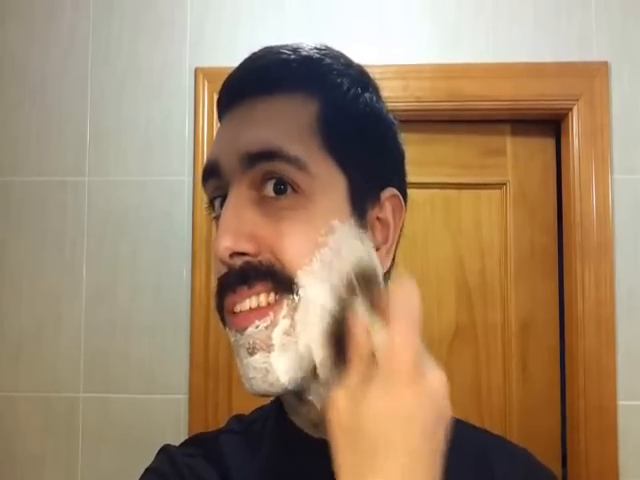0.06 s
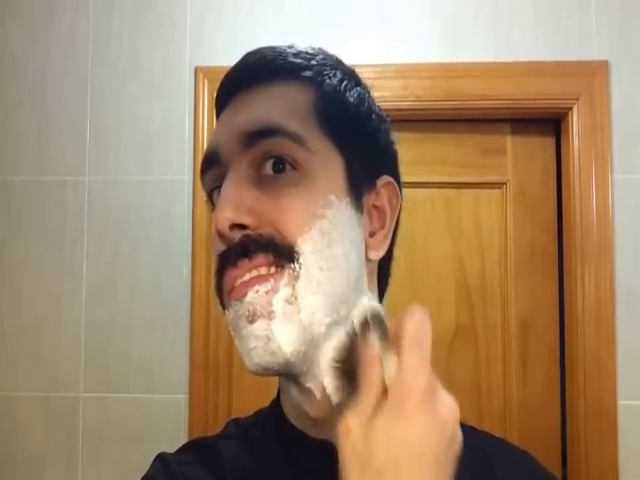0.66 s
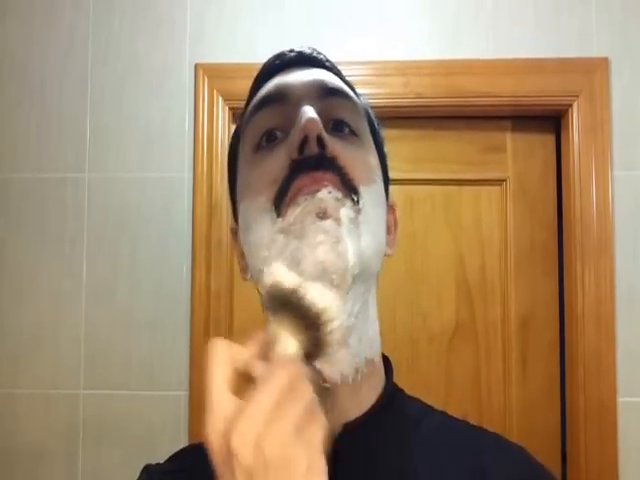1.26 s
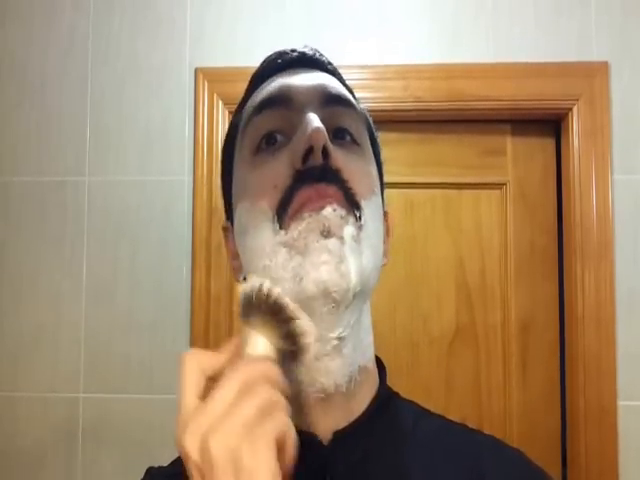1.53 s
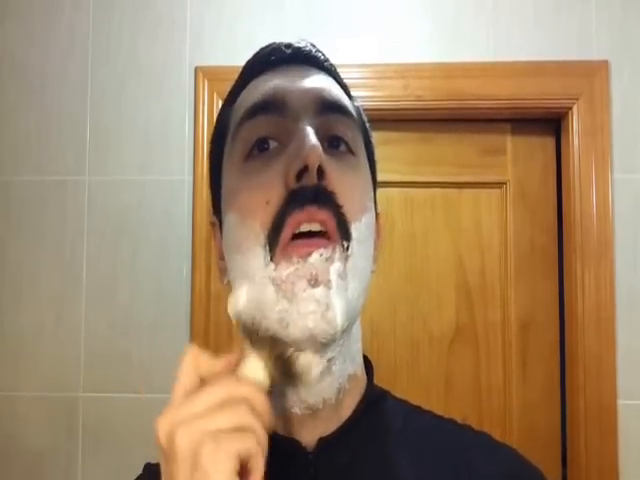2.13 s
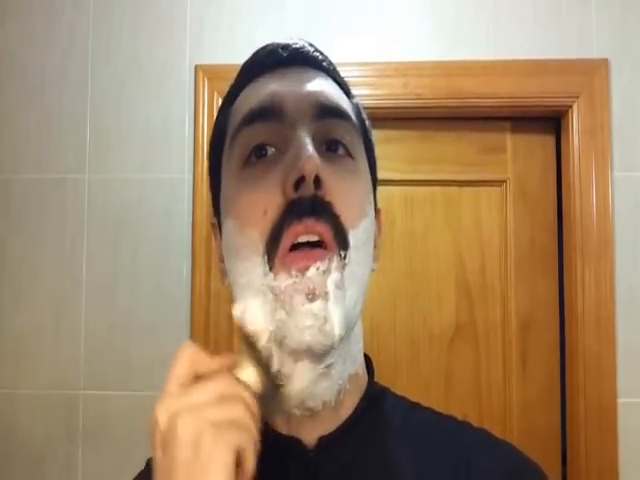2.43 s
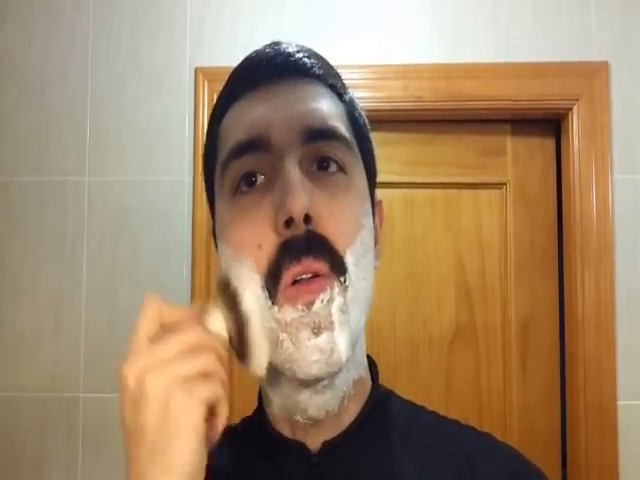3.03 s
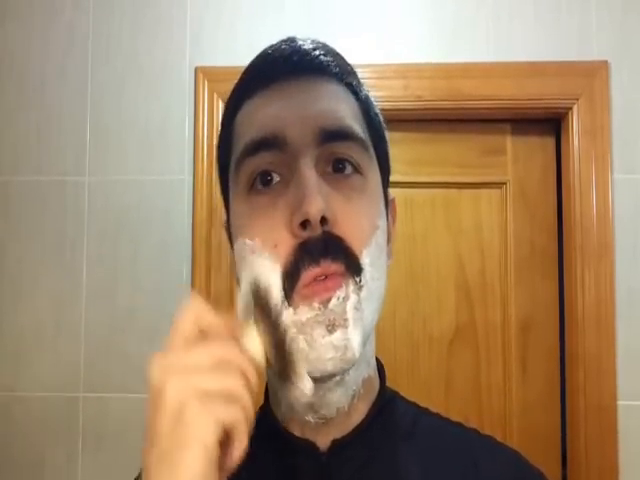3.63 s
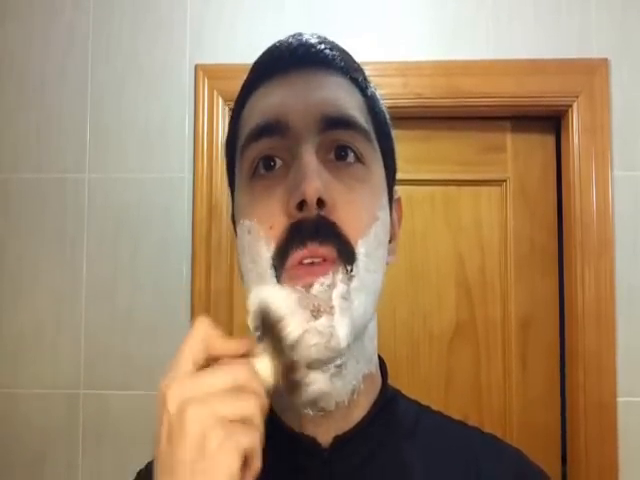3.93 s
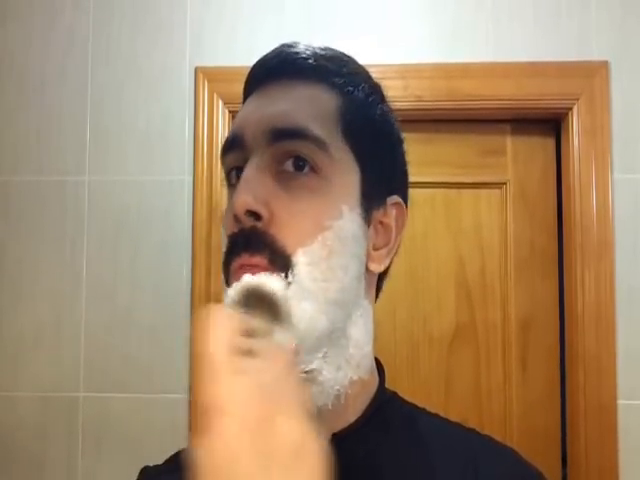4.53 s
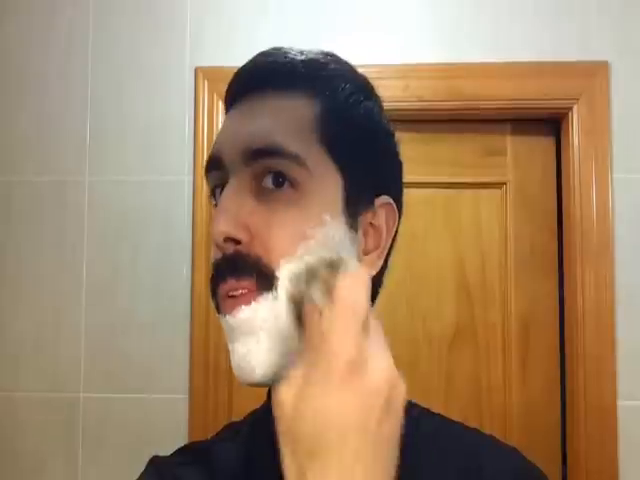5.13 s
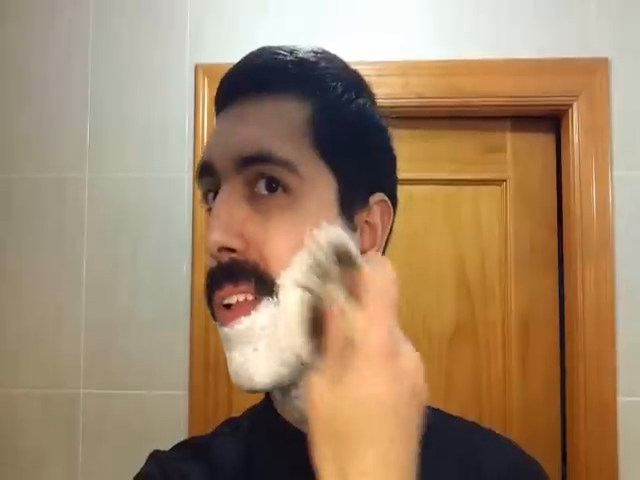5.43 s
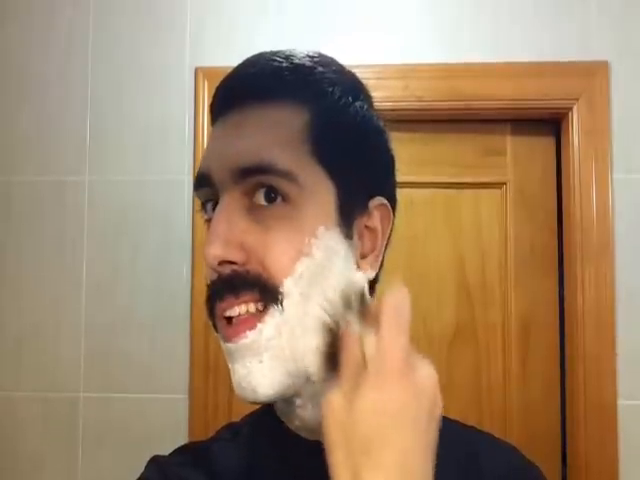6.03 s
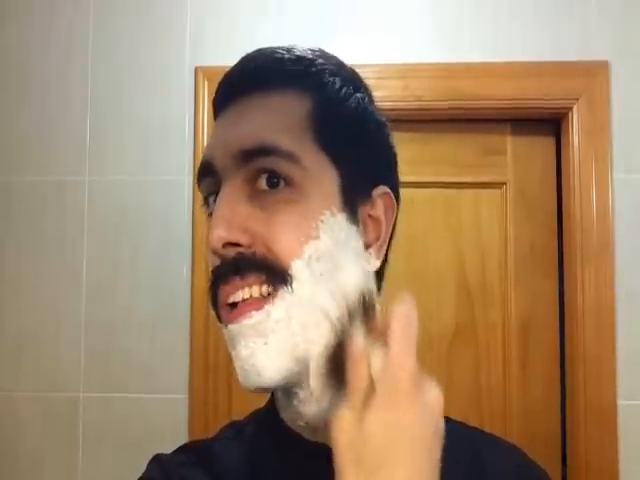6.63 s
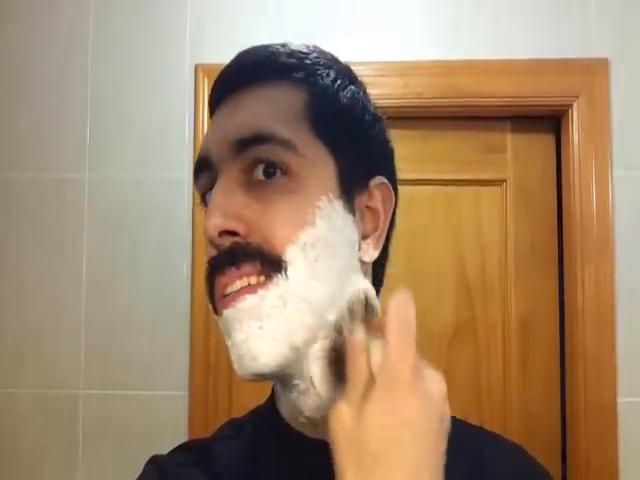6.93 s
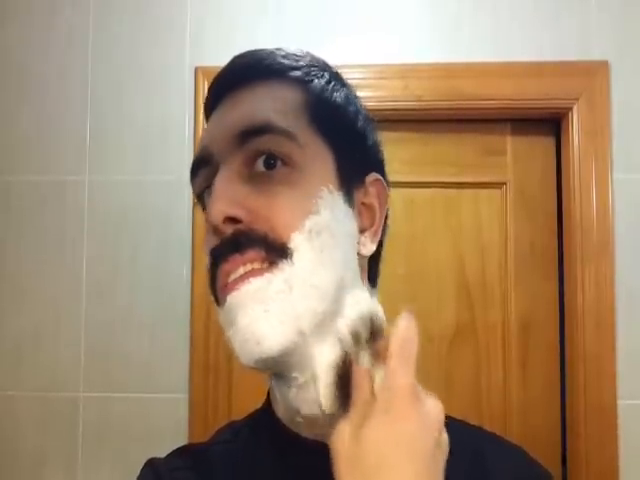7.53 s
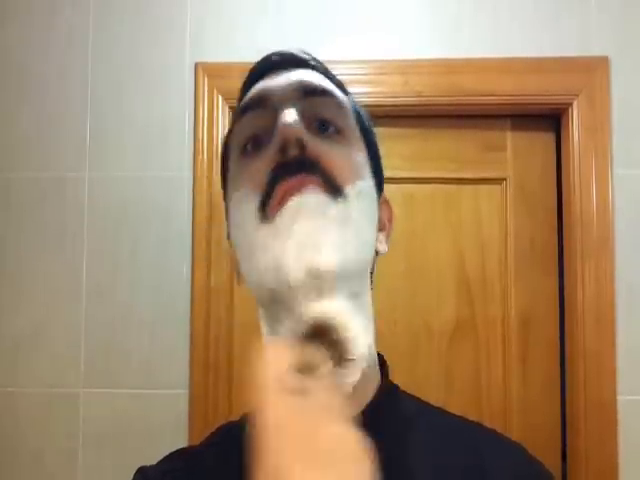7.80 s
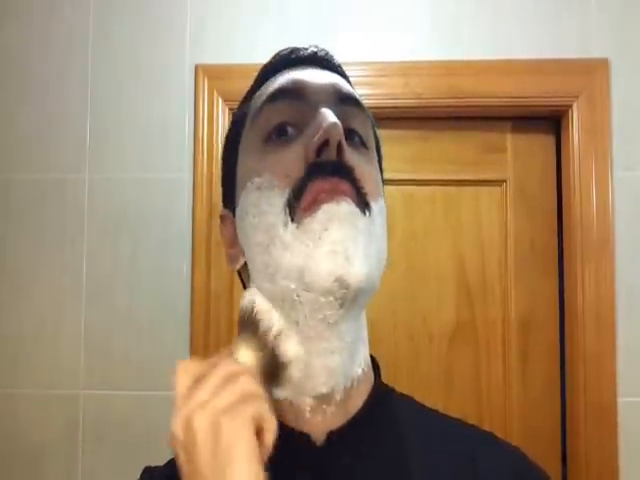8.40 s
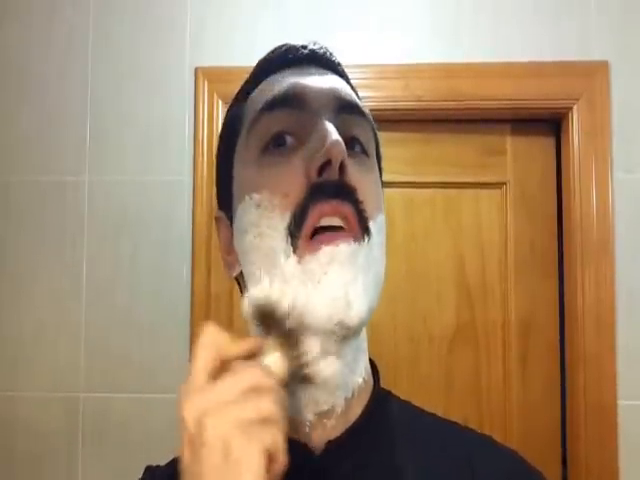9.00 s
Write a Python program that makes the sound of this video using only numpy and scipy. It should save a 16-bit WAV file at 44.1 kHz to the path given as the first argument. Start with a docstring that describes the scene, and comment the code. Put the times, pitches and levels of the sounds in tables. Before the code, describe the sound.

Soft, rapid swishing runs throughout as a wet brush rubs shaving foam back and forth on stubbly skin. The strokes sound a little hollow on the cheek, grow lighter around the middle, then firm up again, with small bristle ticks and a few popping bubbles. A nearby stereo microphone picks up the short reverberation of a tiled bathroom and a constant background hiss.

```python
"""Quick wet swishes, eight or nine a second, sound in a small tiled bathroom over a steady hiss.
A shaving brush is working lather over cheeks and neck: the bristles stick and slip on stubble, the foam
squelches, bursting bubbles fizz, and now and then a tuft flicks free. The tiled walls add resonances and
a short reverberation; a few faint low bumps lie beneath. A phone at arm's length hears it in stereo."""
import sys
import numpy as np
from scipy import signal
from scipy.fft import rfft, irfft
from scipy.io import wavfile
from scipy.ndimage import uniform_filter1d

SR = 44100
rng = np.random.default_rng(int(sys.argv[2]) if len(sys.argv) > 2 else 0)


def log_audio(samples):
    """Write samples as a 16-bit WAV file to the path given in sys.argv[1]."""
    # one column per channel
    frames = np.atleast_2d(samples).T
    # limit to full scale, then quantise
    limited = np.clip(frames, -1, 1)
    pcm = np.round(limited * 32767).astype(np.int16)
    wavfile.write(sys.argv[1], SR, pcm)


N = 408366
TIME, FREQS = np.arange(N) / SR, np.maximum(np.arange(N // 2 + 1) * SR / N, 1)


def undb(db):
    """Amplitude grows tenfold for every 20 dB."""
    return 10 ** (np.asarray(db) / 20)


def unit(x):
    """Normalisation to an rms of one."""
    return x / np.sqrt(np.mean(x ** 2))


def across(points):
    """Interpolation of (freq_hz, value) points on a log-frequency axis."""
    hz, value = np.transpose(points)
    return np.interp(np.log(FREQS), np.log(hz), value)


def colour(x, gain):
    """Linear filtering: the spectrum is multiplied by a gain at each frequency."""
    return irfft(rfft(x) * gain, N)


def drift(rate_hz):
    """Random modulation: straight ramps between random values, at unit rms."""
    hold = int(SR / rate_hz)
    steps = np.repeat(rng.standard_normal(N // hold + 1), hold)
    return unit(uniform_filter1d(steps, hold)[:N])


def corner_db():
    """Standing waves between the tiled walls lift narrow bands of the spectrum."""
    # resonances of the corner: centre_hz, width_hz, lift_db
    modes = [(390, 16, 2), (568, 43, 7), (670, 50, 3.5), (837, 23, 4), (1173, 15, 5), (1556, 170, 3.5),
             (2131, 30, 1), (2326, 80, 1.5), (2540, 80, 2), (4100, 51, 2)]
    return sum(db / (1 + (2 * (FREQS - hz) / width) ** 2) for hz, width, db in modes)


def hiss(level_db=-51, waver_db=-1.35, corner_share=0.45):
    """Broadband noise of room air and microphone, coloured by the room's resonances."""
    # spectral shape of the hiss: freq_hz, density_db
    spectrum = [(25, -3.5), (48, -49), (75, -28), (105, -9.5), (200, -3), (380, 1), (850, 0.5), (1500, 5),
                (2000, 1.5), (4300, 0.5), (6400, -4), (7600, -3.5), (10000, -4.5), (14500, -6.5)]
    noise = colour(rng.standard_normal((2, N)), undb(across(spectrum) + corner_share * corner_db()))
    return unit(noise) * undb(level_db + waver_db * drift(rate_hz=5))


def bumps(width_s=0.016):
    """A few low cycles under a Gaussian envelope have no sharp onset and sound as a soft thud."""
    # faint thuds: middle_s, pitch_hz, level_db
    thuds = [(.55, 100, -71.5), (1.37, 104, -72), (4.0, 72, -79), (4.4, 58, -76), (7.05, 78, -81)]
    out = np.zeros(N)
    for at, hz, db in thuds:
        near = np.abs(TIME - at) < 3 * width_s
        t = TIME[near] - at
        out[near] += undb(db) * np.exp(-(t / width_s) ** 2) * np.sin(2 * np.pi * hz * t)
    return out


def bathroom(x, t60_s=0.47, treble_t60_s=0.22, tail_db=-2.5, first_echo_s=.003, damping_hz=2000):
    """Reverberation: dense reflections from the tiles decay exponentially, the treble first."""
    noise = rng.standard_normal((2, N))
    low = colour(noise, 1 / (1 + (FREQS / damping_hz) ** 2))
    fade = -np.log(1000) * np.minimum(TIME, 2)
    tail = low * np.exp(fade / t60_s) + (noise - low) * np.exp(fade / treble_t60_s)
    tail *= TIME > first_echo_s
    tail *= undb(tail_db) / np.sqrt(np.sum(tail ** 2, axis=1, keepdims=True))
    echoes = signal.fftconvolve(x, tail[:, :SR // 2], axes=1)[:, :N]
    return (x + echoes) / np.hypot(1, undb(tail_db))


def bubbles(decay_s=0.006, rise=3.1):
    """A popping bubble is a damped resonator whose pitch rises a little as it opens."""
    # larger bubbles in the foam: start_s, pitch_hz, level_db
    pops = [(6.054, 934, -41), (6.296, 1020, -42.5), (6.857, 1220, -41.5), (8.051, 1190, -47),
            (8.297, 1500, -45)]
    out = np.zeros(N)
    t = TIME[:SR // 20]
    for at, hz, db in pops:
        start = int(at * SR)
        ring = np.sin(2 * np.pi * hz * t * (1 + rise * t))
        out[start:start + len(t)] += undb(db) * np.exp(-t / decay_s) * ring
    return out


def flicks(decay_s=0.0047, centre_hz=3500, width_octaves=0.58):
    """Elastic release: a bent tuft springs loose with a short tick of band-limited noise."""
    # tufts flicking free: start_s, level_db
    tufts = [(.436, -33), (.514, -35), (1.13, -36), (1.995, -31.5), (2.789, -26.5), (4.555, -37),
             (6.021, -35), (7.594, -32), (7.917, -29), (8.295, -29.5), (8.865, -30), (8.872, -30.5)]
    envelope = np.zeros(N)
    for at, db in tufts:
        near = slice(int(at * SR), int(at * SR) + SR // 20)
        envelope[near] += undb(db) * np.exp(-(TIME[near] - at) / decay_s)
    band = np.exp(-.5 * (np.log2(FREQS / centre_hz) / width_octaves) ** 2)
    return colour(envelope * rng.standard_normal((2, N)), band)


def strokes(reach_s=.05, normal_db=-44, halving_db=17):
    """The hand oscillates evenly in each bout; rows: middle_s, length_s, level_db, squelch_db, fizz_db."""
    # bouts of back-and-forth brushing: first_s, last_s, count, length_s, return_db, squelch_db, fizz_db
    bouts = [(0.046, 0.297, 3, 0.071, -2, -1, 1.3), (0.437, 0.534, 2, 0.059, 1, 0, 1.5),
             (0.66, 1.147, 5, 0.065, 0, -1.7, -1), (1.264, 1.368, 2, 0.089, 1.5, -2.5, -0.5),
             (1.523, 1.876, 4, 0.092, -1, 0.5, -1), (2.018, 2.795, 7, 0.084, -4, 1.4, 0.8),
             (2.911, 3.903, 9, 0.093, 0, -0.4, -0.4), (4.062, 4.452, 4, 0.082, -7.5, 1.3, 2),
             (4.585, 5.228, 7, 0.053, 0.2, 1, 0.7), (5.351, 6.611, 12, 0.062, 1.5, 1.3, -0.6),
             (6.725, 7.16, 5, 0.065, 1.5, 2, 0.4), (7.273, 7.821, 6, 0.067, -2.3, 2, 1),
             (7.94, 8.04, 2, 0.1, 0.9, 0, 2), (8.186, 9.238, 10, 0.076, -0.5, 0.8, 0.6)]
    # firmness of the hand on a forward stroke: time_s, level_db
    effort = [(0, -40.5), (0.53, -43), (0.68, -47.5), (1.1, -45), (1.5, -49.5), (1.85, -45), (2.55, -40.5),
              (3.1, -43.5), (3.5, -43.5), (3.9, -44), (4.07, -40), (4.33, -44.5), (4.6, -52.5), (5.25, -49),
              (5.9, -44.5), (7.5, -42.5), (8.0, -44.4), (9.25, -44.6)]
    # strokes that dig in harder and quicker: time_s, extra_level_db, extra_fizz_db
    accents = [(0.78, 3, 0), (1.14, 3, 0.5), (1.38, 4, 5), (1.64, 4.4, 1.5), (2.79, 2.5, -1),
               (3.04, 2.5, -0.5), (3.16, 3, 2.5), (6.15, 3, 1), (6.94, 3, -0.3), (8.89, 2.5, 1)]
    rows = []
    for first, last, count, length, return_db, squelch_db, fizz_db in bouts:
        for k, at in enumerate(np.linspace(first, last, round(count))):
            accent_db, wet_db = next((row[1:] for row in accents if abs(row[0] - at) < reach_s), (0, 0))
            db = np.interp(at, *np.transpose(effort)) + return_db * (k % 2) + accent_db
            light_db = normal_db - db  # a light touch works the foam more than the stubble
            rows.append((at, length * .5 ** (accent_db / halving_db), db,
                         squelch_db + 0.37 * light_db, fizz_db + 0.5 * light_db + wet_db))
    return np.array(rows)


def stroke_envelope(extra_db=0, rub_db=-62):
    """Friction noise swells with brush speed and sinks to a faint rub at each turn; the powers add."""
    power = np.full(N, undb(rub_db) ** 2)
    middles, lengths, levels, _, _ = strokes().T
    for at, length, db in zip(middles, lengths, levels + extra_db):
        near = slice(max(0, int((at - 2 * length) * SR)), int((at + 2 * length) * SR))
        power[near] += undb(db) ** 2 * np.exp(-(2 * (TIME[near] - at) / length) ** 2)
    return np.sqrt(power)


def splay(on_cheek, centre_hz=3700, half_width_hz=430, wander=.05, gain_db=-8.5):
    """Flattened on the cheek, the wet knot swishes hollowly: narrowband noise with a wandering pitch."""
    band = colour(rng.standard_normal((2, N)), 1 / (1 + (FREQS / half_width_hz) ** 2))
    pitch_hz = centre_hz * (1 + wander * drift(rate_hz=9))
    phase = 2 * np.pi * np.cumsum(pitch_hz) / SR
    force = stroke_envelope()
    opening = np.sqrt(unit(force))  # the knot opens most in the firm middle of a stroke
    return unit(band * np.sin(phase)) * force * opening * on_cheek * undb(gain_db)


def grains(rate_hz, spread_db):
    """Shot noise: dense tiny clicks of uneven size, each with its own strength in each channel."""
    size = undb(spread_db * np.clip(rng.standard_normal(N), -2, 2))
    clicks = rng.random(N) < rate_hz / SR
    return unit(clicks * size * rng.standard_normal((2, N)))


def brush(squelch_hz=1500, fizz_hz=5800, gain_db=1.5, catch_db=1.0):
    """Stick-slip friction modulates three bands together: foam squelch, bristle rasp and bubble fizz."""
    _, _, _, squelch_db, fizz_db = strokes().T
    low = 1 / (1 + (FREQS / squelch_hz) ** 6)
    high = 1 / (1 + (fizz_hz / FREQS) ** 6)
    middle = (1 - low) * (1 - high)
    squelch = colour(grains(rate_hz=5000, spread_db=2.5), np.sqrt(low)) * stroke_envelope(squelch_db)
    rasp = colour(grains(rate_hz=8500, spread_db=3.0), np.sqrt(middle)) * stroke_envelope()
    fizz = colour(grains(rate_hz=14000, spread_db=2.0), np.sqrt(high)) * stroke_envelope(fizz_db)
    return (squelch + rasp + fizz) * undb(gain_db + catch_db * drift(rate_hz=110))


def scene():
    """Superposition: the brush moves between cheek and neck, each with its own path and echoes."""
    # position of the brush: time_s, cheek_share (0 = neck and jaw, 1 = near cheek)
    places = [(0, 0.97), (1.12, 1), (1.28, 0.046), (2.2, 0.11), (3.3, .15), (4.3, .05), (4.8, 0.5),
              (5.5, 0.36), (6.6, 0.79), (7.72, 0.77), (8.0, 0.24), (9.2, .15)]
    # spectral shape of bristles in lather: freq_hz, gain_db
    swish = [(100, -52), (220, -17), (400, -10.5), (600, -10), (800, -8.5), (1100, -4), (1900, -1.5),
             (2500, -1), (3100, 0), (3900, 3), (5000, -3), (6400, -8.5), (7800, -5.5), (14000, -17.5)]
    # response of the path from the cheek: freq_hz, gain_db
    cheek_path = [(400, -1.5), (700, 0), (1100, 1.6), (1600, 1.8), (2000, -0.9), (2600, -0.4), (3000, -1),
                  (3550, 0.4), (4300, -0.5), (5200, -2.5), (7200, 1.9), (10000, 0)]
    # response of the path from the neck: freq_hz, gain_db
    neck_path = [(400, -2.3), (700, 0.7), (1400, -0.67), (2200, -0.4), (2900, -0.7), (3700, -1),
                 (5200, 1.2), (9000, -0.56)]
    on_cheek = np.clip(np.interp(TIME, *np.transpose(places)), 0, 1)
    lather = colour(brush() + flicks() + bubbles(), unit(undb(across(swish) + corner_db())))
    cheek = bathroom(colour(lather * on_cheek + splay(on_cheek), undb(across(cheek_path))))
    neck = bathroom(colour(lather * (1 - on_cheek), undb(across(neck_path))))
    return cheek + neck + bumps() + hiss()


def record(dry, top_hz=14550):
    """Partial coherence: left and right are partly alike, each with its own colour; the top is cut."""
    # likeness of the left and right channels, most alike near 5 kHz: freq_hz, correlation, left_lead_rad
    coherence = [(150, .05, 0), (550, .48, -.6), (1050, .42, -1), (1700, .4, -2.8), (2100, .3, -1.3),
                 (2500, .53, -.6), (3200, .33, -1.3), (4200, .28, -.4), (5200, .72, 0), (6500, .1, 0),
                 (8000, .05, 0), (13000, .4, 0)]
    # balance of the two channels: freq_hz, left_minus_right_db
    balance = [(300, 0.5), (900, -.5), (1300, -1.5), (1600, -2.5), (2100, 1.5), (2600, -2), (3100, -3),
               (3800, -7), (4500, -2.5), (5300, 0), (6300, 4), (7300, 10), (9000, 5.5), (14000, 2.5)]
    correlation, lead_rad = (across(np.array(coherence)[:, [0, k]]) for k in (1, 2))
    mix_angle = np.arcsin(np.clip(correlation, -1, 1)) / 2
    shared = colour(dry, np.cos(mix_angle)) + colour(dry[::-1], np.sin(mix_angle))
    sides = np.array([[.5], [-.5]])
    gains = undb(across(balance) * sides)
    gains /= np.sqrt(np.mean(gains ** 2, axis=0))
    return colour(shared, gains * np.exp(1j * lead_rad * sides) * (FREQS < top_hz))


dry = scene()
out = record(dry)
log_audio(out)
```